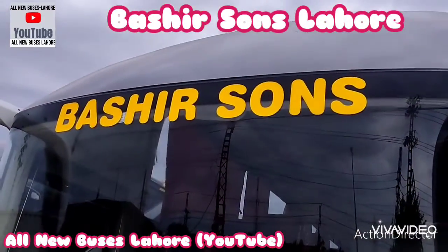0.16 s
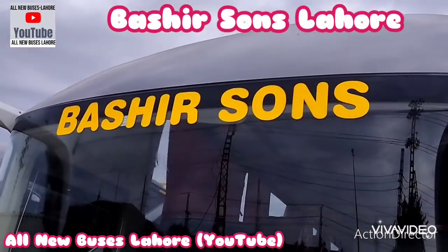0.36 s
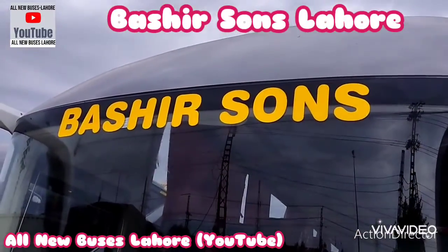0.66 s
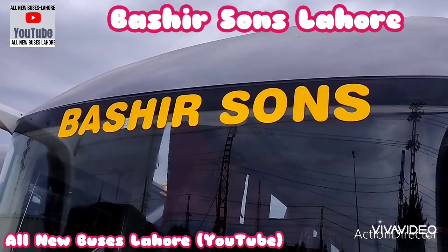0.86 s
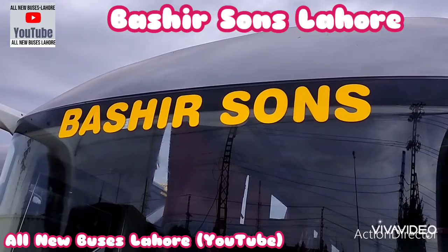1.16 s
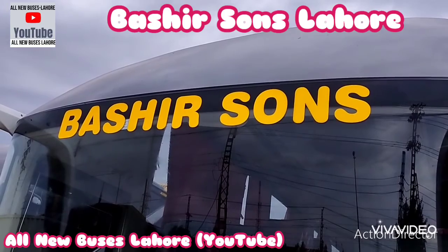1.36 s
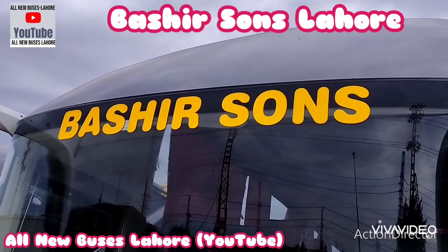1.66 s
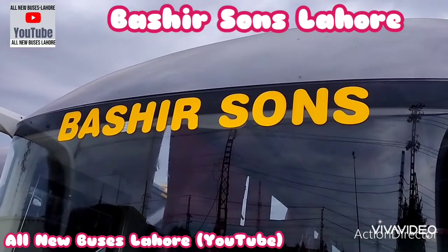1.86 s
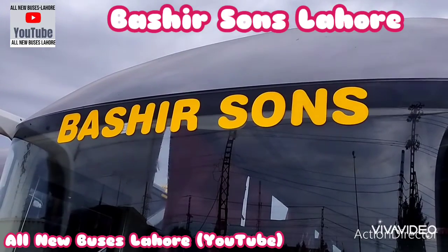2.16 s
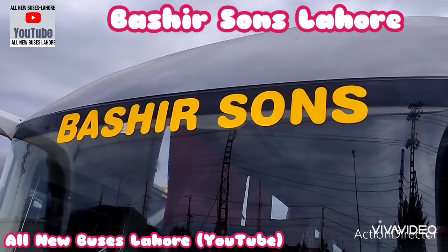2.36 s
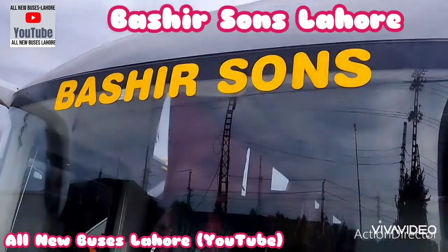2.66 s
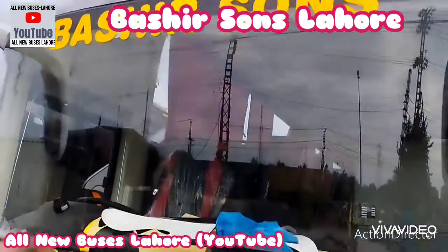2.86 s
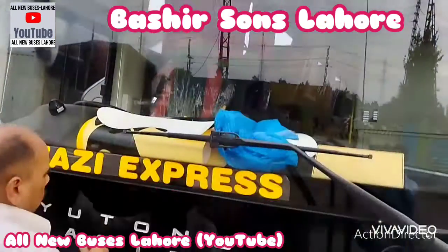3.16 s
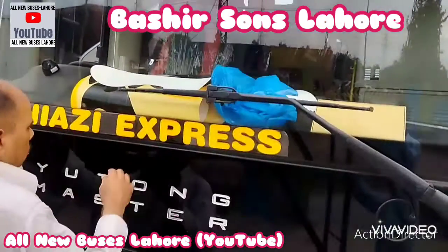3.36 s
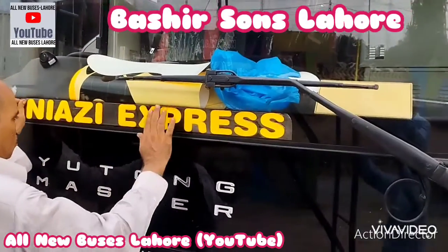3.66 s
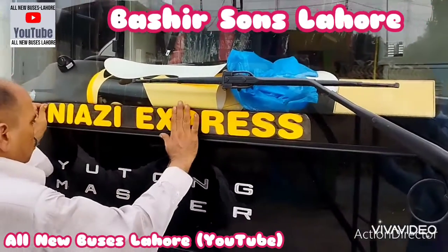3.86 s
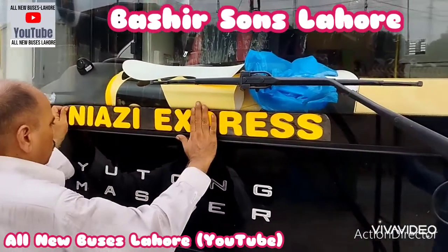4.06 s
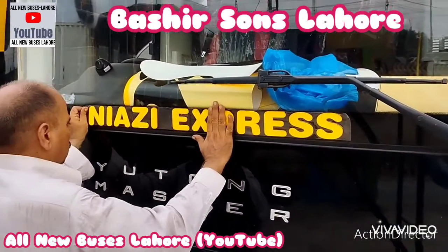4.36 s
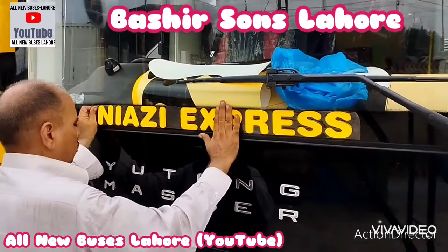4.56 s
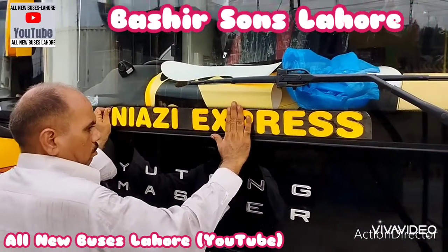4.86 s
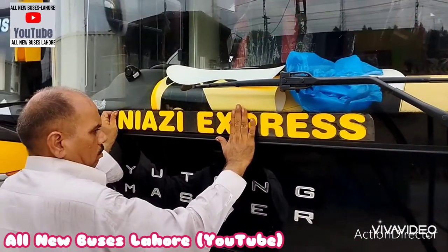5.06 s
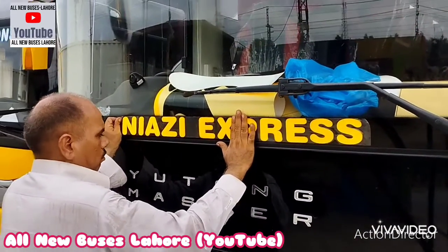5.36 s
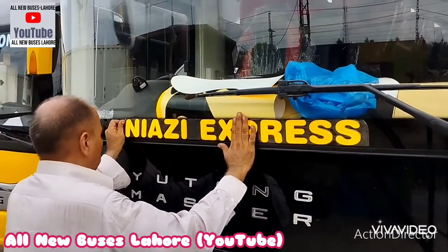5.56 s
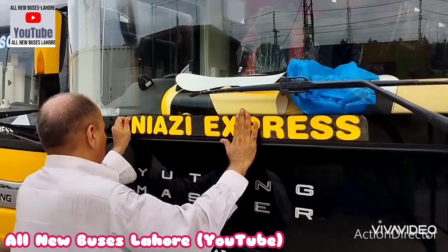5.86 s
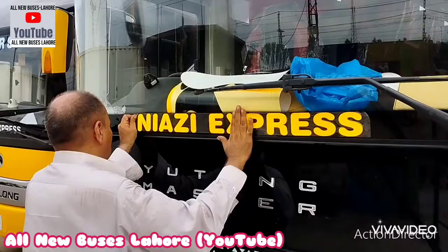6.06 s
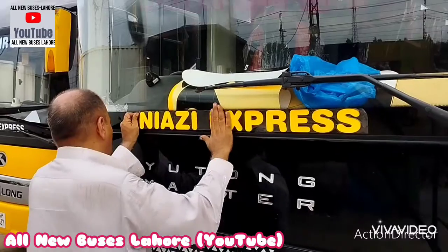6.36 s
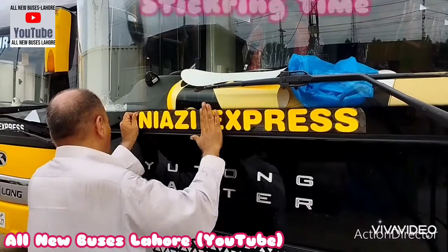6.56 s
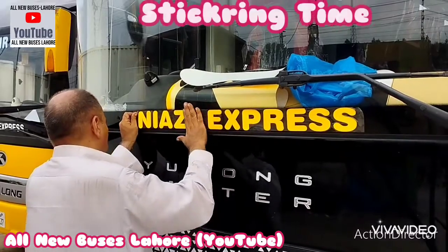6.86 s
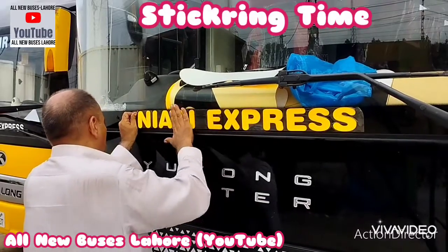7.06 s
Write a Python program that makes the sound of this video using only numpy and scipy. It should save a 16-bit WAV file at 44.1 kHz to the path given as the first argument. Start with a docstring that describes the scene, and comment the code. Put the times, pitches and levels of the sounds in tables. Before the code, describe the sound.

A palm squeaks and chirps on smooth glass in rapid stuttering bursts, then only dry rubbing strokes remain over a low yard hum.

```python
"""Squeaky palm on a windscreen

A palm presses vinyl lettering onto a bus windscreen in an open workshop yard.
The skin sticks and slips about 3000 times a second: clean squeaks, rough chirps and snags that ring
the pane, over the noise of rubbing; then dry strokes only. Around it are shaped noise for the yard,
wavering sines for a humming machine and a distant drone, and low noise for air on the microphone."""
import sys
import numpy as np
from scipy import signal
from scipy.fft import rfft, irfft, next_fast_len
from scipy.io import wavfile
from scipy.ndimage import uniform_filter1d

SR = 44100
rng = np.random.default_rng(int(sys.argv[2]) if len(sys.argv) > 2 else 0)


def master(y):
    """Save y as 16-bit WAV."""
    cut = np.clip(np.atleast_2d(y).T, -1, 1)
    pcm = np.round(cut * 32767)  # scale
    wavfile.write(sys.argv[1], SR, pcm.astype(np.int16))


N = 317961
TIME = np.arange(N) / SR  # s

# colour of dragging skin, for the rubbing and the scuff in the squeaks: f/Hz, relative level/dB per Hz
RASP_COLOUR = [(700, -4), (1300, 0.5), (2200, 4.5), (3200, 2), (4500, 1), (6000, -1), (7200, -2),
               (8300, -11.5), (16000, -44)]


def from_db(db):
    """Turn decibels into a gain."""
    return 10 ** (np.asarray(db) / 20)


def rms_one(x):
    """Scale to an average (rms) strength of 1."""
    return x / np.sqrt(np.mean(x ** 2) + 1e-20)


def in_time(rows):
    """Read each column of a curve at every sample."""
    s, *columns = np.transpose(rows)
    return [np.interp(TIME, s, c) for c in columns]


def at_hz(points, hz):
    """Read each column of a spectrum along a log-frequency axis."""
    f, *columns = np.transpose(points)
    return [np.interp(np.log(hz), np.log(f), c) for c in columns]


def drift(rate):
    """Smooth random wandering with spread 1; a higher rate wanders faster."""
    # worked out at an eighth of the sample rate; the first 8000 values let the filter settle
    r = np.exp(-16 * np.pi * rate / SR)
    noise = rng.standard_normal(N // 8 + 8002)
    slow = signal.lfilter([1], [1, -2 * r, r * r], noise)[8000:]
    return np.interp(np.arange(N) / 8, np.arange(len(slow)), rms_one(slow))


def pan(balance_db):
    """Left and right gains of equal total power, from left minus right in dB."""
    gains = from_db(np.atleast_1d(balance_db) * np.array([[.5], [-.5]]))
    return gains / np.sqrt(np.mean(gains ** 2, axis=0))


def white():
    """Unrelated noise in two channels."""
    return rng.standard_normal((2, N))


def coloured(spectrum, excitation):
    """Mix two unrelated noises into a stereo pair with this spectrum and rms 1."""
    # how noise reaches the two ports: f/Hz, likeness -1 to 1, left minus right level/dB
    ports = [(30, 0.99, 10), (70.5, 0.91, -5.5), (129, 1, -1), (297, 0.83, -0.5), (627, 0.57, 0),
             (1500, -0.47, -6.5), (2370, 0.014, -5.5), (4500, -0.15, -3.5), (6900, 0.16, -8),
             (14300, -0.36, -2)]
    size = next_fast_len(N)
    hz = np.maximum(np.fft.rfftfreq(size, 1 / SR), 1)
    mid, side = rfft(excitation, size)
    alike, balance_db = at_hz(ports, hz)
    alike = np.clip(alike, -1, 1)
    shared = np.sqrt(1 + alike) * mid
    opposed = np.sqrt(1 - alike) * side * [[1], [-1]]
    pair = (shared + opposed) * pan(balance_db)
    level_db, = at_hz(spectrum, hz)
    low_edge = 1 / np.sqrt(1 + (spectrum[0][0] / hz) ** 4)  # fades below the first frequency
    return rms_one(irfft(pair * low_edge * from_db(level_db), size)[:, :N])


def ring(clicks, hz, t60):
    """A unit click starts a sine of height 1 that falls by 60 dB in t60 seconds."""
    r, w = from_db(-60 / (t60 * SR)), 2 * np.pi * hz / SR
    return signal.lfilter([0, np.sin(w)], [1, -2 * r * np.cos(w), r * r], clicks + 1e-18)


def swell(s, length):
    """A smooth rise and fall around a moment."""
    return np.exp(-2 * ((TIME - s) / length) ** 2)


def yard_rumble(exposure_db):
    """Shaped noise for the yard, following a quarter or so of the exposure in dB."""
    # rumble of the yard: f/Hz, relative level/dB per Hz
    yard_colour = [(20, 7), (35, 5), (60, -2), (110, 0.5), (160, 0.5), (205, -9), (270, -5), (350, -10.5),
                   (500, -12.5), (800, -16.5), (1300, -21), (3000, -34.5), (8000, -80), (16000, -116)]
    return from_db(-23.5 + 0.24 * exposure_db) * coloured(yard_colour, white())


def hum(exposure_db, waver_db, wander, spread):
    """Machine tones that waver a little and reach the two ports at different phases."""
    # machine tones: f/Hz, rms level/dB before exposure and waver
    machine_lines = [(32.3, -25.5), (38.4, -30), (106, -37.5), (220, -36.5), (233, -34), (261, -38.5),
                     (274, -40.5)]
    out = 0
    for hz, db in machine_lines:
        shade_db = exposure_db * (hz > 100)  # the deepest tones ignore the exposure
        phase = 2 * np.pi * hz * TIME + wander * drift(0.87) + rng.uniform(0, 2 * np.pi)
        port_phase = spread * drift(2.1) * np.array([[1], [-1]])
        out = out + from_db(db + shade_db + waver_db * drift(1.73)) * np.sin(phase + port_phase)
    return np.sqrt(2) * out * pan(balance_db=0.0)


def drone(width_hz, gain_db, throb_db, overtone_hz, overtone_db):
    """A low distant note wavers in pitch and level; ringing noise adds a faint blurred overtone."""
    # the drone's rises and falls: t/s, f/Hz before wavering, level/dB before the gain
    drone_curve = [(1.85, 150, -42), (2.04, 162, -24.5), (2.2, 142.2, -24.5), (2.4, 139.3, -28),
                   (2.52, 156.3, -22.5), (2.66, 167, -25.5), (2.72, 148.5, -23), (2.84, 146.4, -22),
                   (3.02, 131.3, -28.5), (3.27, 165, -25), (3.5, 149, -44)]
    hz, level_db = in_time(drone_curve)
    phase = 2 * np.pi * np.cumsum(hz + width_hz * drift(15.2)) / SR
    note = rms_one(np.sin(phase) * from_db(throb_db * drift(16)))
    blur = rms_one(ring(rng.standard_normal(N), overtone_hz, t60=0.17))
    return from_db(level_db + gain_db) * (note + from_db(overtone_db) * blur)


def buffeting(gain_db):
    """Low noise of air on the ports, stronger on the left: gusts swell over a faint breeze."""
    # gusts: middle t/s, swell length/s, peak level/dB before the gain
    gusts = [(0, 0.14, -21), (1.76, 0.14, -16), (1.972, 0.088, -15.5), (3.04, 0.06, -19), (3.18, 0.09, -19),
             (3.838, 0.43, -16.5), (7.21, 0.39, -21.5)]
    # colour of the air noise: f/Hz, relative level/dB per Hz
    air_colour = [(20, 0.5), (40, 3), (70, 0.5), (130, -4), (200, -12), (400, -24), (1000, -71)]
    power = from_db(-31.5) ** 2  # the breeze between gusts
    for s, length, db in gusts:
        power = power + (from_db(db) * swell(s, length)) ** 2
    return from_db(gain_db) * np.sqrt(power) * coloured(air_colour, white()) * pan(balance_db=16.5)


def polishing(count):
    """Evenly paced strokes to and fro, each shorter and with more hiss than the one before."""
    start_s, period_s = 6.262, 0.201
    first_length_s, shortening = 0.093, 0.8
    rasp_db, hiss_db, hiss_rise_db = -37.5, -31.5, 2  # before the gains in rubbing
    return [(start_s + k * period_s, first_length_s * shortening ** k, rasp_db, hiss_db + k * hiss_rise_db)
            for k in range(count)]


def rubbing(rasp_db, hiss_db, grain_db, hiss_grain_db):
    """Skin ridges catch in dense uneven grains; fast sliding adds a finer, brighter hiss."""
    # steady contact of the palm: t/s, rasp level/dB, hiss level/dB (before the gains)
    steady_contact = [(0, -36.5, -37), (0.92, -37.5, -39.5), (1.22, -37, -34), (1.6, -40, -35.5),
                      (2.15, -37, -36), (2.45, -45, -35.5), (2.7, -36, -33), (3.32, -45, -42),
                      (3.55, -37, -33.5), (3.95, -39, -35), (4.7, -42.5, -40.5), (4.97, -34.5, -28.5),
                      (5.45, -36.5, -34.5), (5.9, -37, -30.5), (6.5, -39.5, -33.5), (7.21, -37.5, -32.5)]
    # single strokes: middle t/s, swell length/s, rasp level/dB, hiss level/dB (before the gains)
    single_strokes = [(0.222, 0.034, -33, -46), (0.507, 0.086, -34, -35), (0.772, 0.12, -31.5, -28.5),
                      (1.075, 0.098, -32, -25), (2.315, 0.083, -36.5, -31.5), (2.576, 0.027, -32.5, -33),
                      (3.472, 0.059, -32.5, -36), (4.082, 0.079, -37.5, -27), (4.353, 0.082, -37.5, -35),
                      (4.803, 0.058, -46, -32.5)]
    # colour of fast sliding: f/Hz, relative level/dB per Hz
    hiss_colour = [(2000, -14), (5000, -7), (6800, -1), (8200, -11), (9300, -7), (11000, -11), (12500, -4),
                   (15000, 0), (16000, -1)]
    drag, slide = from_db(in_time(steady_contact))
    for s, length, drag_db, slide_db in list(single_strokes) + polishing(count=5):
        stroke = swell(s, length)
        drag = np.hypot(drag, from_db(drag_db) * stroke)
        slide = np.hypot(slide, from_db(slide_db) * stroke)
    drag_noise = coloured(RASP_COLOUR, white() * from_db(grain_db * drift(100)))
    slide_noise = coloured(hiss_colour, white() * from_db(hiss_grain_db * drift(130)))
    return from_db(rasp_db) * drag * drag_noise + from_db(hiss_db) * slide * slide_noise


def snags(release_s, gain_db, crack_db, ticks_per_s):
    """Each snag lets go with a crack, then a dying crackle of small slips, and the pane rings."""
    # the palm snags and lets go: t/s, strength level/dB before crack and crackle gains
    snag_times = [(0.083, -19), (0.1888, -6), (0.2166, -13), (0.4843, -7), (0.499, -17), (0.521, -15),
                  (0.761, -8), (0.7942, -12.5), (0.9725, -8.5), (1.978, -16), (2.335, -16), (2.572, -10),
                  (3.4437, -16)]
    # ringing tones of the pane: f/Hz, level/dB, time to fall by 60 dB/s
    pane_modes = [(2360, -2, 0.014), (3270, -4, 0.0099), (3845, 0, 0.017), (4370, -1, 0.0082),
                  (5520, 0.5, 0.0089)]
    slips = np.zeros(N)
    ticks = (rng.random(N) < ticks_per_s / SR) * rng.standard_normal(N)
    for s, peak_db in snag_times:
        start = int(s * SR)
        fade = np.exp(-np.minimum((TIME[start:] - s) / release_s, 20))
        slips[start:] += from_db(peak_db + gain_db) * fade * ticks[start:]
        slips[start] += from_db(peak_db + crack_db)
    # neighbouring tones ring with opposite signs
    return sum((-1) ** k * from_db(db) * ring(slips, hz, t60) for k, (hz, db, t60) in enumerate(pane_modes))


def catches(per_s, unevenness):
    """The skin grips and lets go unevenly: progress 0-1 through each catch, its pitch and strength."""
    turns = np.cumsum(per_s * np.exp(unevenness * drift(59.43))) / SR
    pitch, strength = rng.standard_normal((4000, 2))[turns.astype(int) % 4000].T
    return turns % 1, pitch, uniform_filter1d(strength, size=40)


def contact(s, length):
    """The samples of one squeak, the way through it from -.5 to .5, and its soft-edged gate."""
    edge_s = .0014  # each fade reaches this far to either side of its end of the squeak
    length = max(length, .005)
    span = slice(max(int((s - edge_s) * SR), 0), int((s + length + edge_s) * SR))
    along = (TIME[span] - s) / length - .5
    gate = np.clip((.5 - abs(along)) * length / (2 * edge_s) + .5, 0, 1)
    return span, along, np.sin(gate * np.pi / 2) ** 2


def grips():
    """Give every squeal, note and chirp as (samples, gate, level dB, pitch Hz, roughness)."""
    # how raggedly the skin grips in the squeals: t/s, roughness 0-1
    ragged_curve = [(.08, .25), (.14, .55), (.29, .35), (1.37, .9), (1.48, .8), (3.4, .5), (4.05, .45),
                    (4.17, .5), (4.25, .8), (4.57, .35), (4.65, .6), (4.8, .4)]
    # long stuttering squeals of the dragged palm, one curve each: t/s, f/Hz, level/dB before a small cut
    squeal_curves = [
        [(0.067, 3400, -28.5), (0.082, 3200, -25), (0.112, 3050, -24), (0.132, 2560, -28), (0.14, 3000, -32),
         (0.175, 3050, -28)],
        [(0.25, 3076, -26), (0.272, 3110, -29), (0.283, 2974, -21.5), (0.296, 2900, -24), (0.302, 3050, -32),
         (0.312, 3130, -26), (0.33, 2990, -36)],
        [(1.305, 3500, -30), (1.335, 3480, -24), (1.355, 3480, -41), (1.396, 3280, -20), (1.404, 3360, -27),
         (1.422, 3350, -27), (1.437, 3170, -23.5), (1.462, 3300, -27.5), (1.52, 3000, -26.5),
         (1.64, 2980, -27.5), (1.69, 3050, -31), (1.78, 3000, -35)],
        [(3.065, 3150, -28), (3.14, 3060, -35)],
        [(3.355, 3245, -33), (3.372, 3020, -18), (3.386, 3087, -22), (3.41, 3020, -20.5), (3.43, 3140, -26),
         (3.46, 2970, -34)],
        [(3.724, 3040, -27.5), (3.76, 3030, -31.5), (3.822, 2990, -35), (3.836, 3010, -26), (3.9, 2970, -36)],
        [(4.026, 2840, -33), (4.055, 2740, -29), (4.075, 2600, -26), (4.1, 2720, -35), (4.122, 2920, -23),
         (4.15, 3160, -28)],
        [(4.15, 3280, -29), (4.172, 3170, -20), (4.2, 3190, -25.5), (4.225, 3290, -27), (4.262, 3230, -25.5),
         (4.285, 3230, -37)],
        [(4.335, 2680, -40), (4.365, 2860, -33), (4.42, 3080, -32)],
        [(4.545, 3126, -22), (4.565, 3175, -23), (4.595, 3090, -31), (4.63, 3160, -25.5), (4.67, 3315, -33),
         (4.72, 3290, -22), (4.775, 3300, -31), (4.85, 3180, -38)],
    ]
    # even slips sing clean notes: start t/s, length/s, level/dB, middle f/Hz, glide/Hz
    clean_notes = [(0.015, 0.032, -22.5, 3210, 60), (0.374, 0.058, -25, 3220, -2),
                   (.635, .037, -22.5, 3170, -40), (1.239, 0.019, -26, 3500, 192),
                   (1.595, 0.02, -17.5, 3035, -50), (1.829, 0.02, -18.5, 2946, 102),
                   (1.902, 0.048, -23, 3265, -30), (2.363, 0.036, -16.5, 3130, 200),
                   (2.444, 0.02, -21, 3050, -120), (2.638, 0.049, -15.5, 3100, 218),
                   (4.484, 0.039, -20, 3173, -150)]
    # the skin catches once and chirps: start t/s, length/s, middle level/dB, middle f/Hz
    single_chirps = [(.048, 0.0057, -18.5, 2800), (0.097, .009, -19, 2870), (0.113, 0.0072, -23, 2740),
                     (.126, .008, -26, 2510), (0.147, 0.0076, -24, 2850), (0.217, .008, -18, 3000),
                     (0.427, 0.0089, -21.5, 3080), (0.452, 0.009, -22.5, 2980), (.528, .005, -30, 3080),
                     (0.543, .007, -27.5, 2940), (0.62, .014, -20, 2910), (.672, 0.0077, -18.5, 2960),
                     (.686, 0.012, -22, 2770), (0.869, .009, -24, 3000), (0.88, .01, -24, 2970),
                     (0.902, .008, -31, 2950), (0.953, .012, -23.5, 3040), (1.382, 0.0065, -16.5, 3100),
                     (1.423, 0.0091, -17, 2977), (1.506, .009, -25, 2940), (1.523, .011, -15.5, 2945),
                     (1.536, .008, -21, 2760), (1.543, 0.0097, -19, 3060), (1.557, 0.014, -18.5, 2904),
                     (1.583, 0.0098, -23, 3090), (1.619, 0.0091, -16.5, 2990), (1.632, .014, -21, 3026),
                     (1.648, 0.015, -23, 2910), (1.673, .009, -25, 3300), (1.684, 0.011, -21.5, 3170),
                     (1.701, 0.011, -19.5, 3030), (1.72, 0.011, -22.5, 3240), (1.734, 0.006, -17.5, 2850),
                     (1.757, 0.018, -23, 3190), (1.804, .013, -18, 2853), (1.851, 0.013, -21.5, 2870),
                     (1.88, 0.011, -22, 2980), (1.941, .009, -17, 3090), (1.953, 0.0073, -17, 3040),
                     (1.962, .007, -20, 2950), (1.988, .013, -18.5, 3064), (2.023, .007, -21, 3210),
                     (2.066, .006, -22, 3300), (2.131, .011, -25, 3050), (2.147, 0.0084, -21, 3020),
                     (2.304, 0.008, -23, 2970), (2.328, 0.0062, -20, 3350), (2.345, .007, -15, 2860),
                     (2.405, 0.009, -16.5, 3280), (2.421, 0.0066, -13.5, 3085), (2.431, .012, -13, 3047),
                     (2.506, 0.011, -22, 2730), (2.532, 0.013, -18, 3100), (2.547, .007, -19.5, 2790),
                     (2.57, 0.011, -18.5, 3074), (2.692, 0.01, -21, 3080), (2.726, .0075, -15.5, 3070),
                     (2.748, 0.02, -22, 3070), (2.823, .01, -16, 2926), (2.851, 0.012, -27, 2894),
                     (2.911, 0.0095, -24, 3000), (2.978, .009, -27, 2950), (2.991, .013, -15.5, 3067),
                     (3.01, 0.0074, -14, 2880), (3.02, 0.0065, -12.5, 2690), (3.029, 0.0071, -16, 3010),
                     (3.038, .006, -15.5, 3253), (3.048, 0.0063, -15.5, 3195), (3.057, .006, -13.5, 3070),
                     (3.145, 0.014, -15, 3040), (3.182, 0.017, -13.5, 3320), (3.249, 0.0074, -15, 3100),
                     (3.28, 0.013, -25, 2970), (3.301, .007, -12, 3250), (3.31, .017, -22.5, 3150),
                     (3.913, 0.0075, -17.5, 3020), (3.924, 0.01, -20, 3090), (4.014, .012, -18, 2880),
                     (4.359, 0.0089, -26, 2890), (4.377, .008, -25, 3070), (4.399, 0.014, -24, 3030),
                     (4.525, 0.015, -23, 3026), (4.728, 0.011, -18.5, 3115), (5.812, 0.0072, -25, 2330)]
    ragged = np.clip(in_time(ragged_curve)[0], 0, 1)
    for curve in squeal_curves:
        s, hz, db = np.transpose(curve)
        span, along, gate = contact(s[0], s[-1] - s[0])
        level_db = np.interp(TIME[span], s, db) - 0.5
        yield span, gate, level_db, np.interp(TIME[span], s, hz), ragged[span]
    for s, length, db, hz, glide_hz in clean_notes:
        span, along, gate = contact(s, length)
        arch_hz = 60 * (2 * along) ** 2  # the ends sag below the middle
        yield span, gate, db, hz + glide_hz * along - arch_hz, .035
    for s, length, db, hz in single_chirps:
        glide_hz = -60 - 18 * (db + 19.5)  # louder chirps fall further; the faintest rise
        span, along, gate = contact(s, length)
        yield span, gate, db + 0.5 * along, hz + glide_hz * along, .32  # grows by half a dB


def squeaks(step_hz, fall_hz, jitter_hz, flutter_db, dip, bite_db, scrape_db, patch_db, patch_above_hz,
            scuff_db):
    """Stick-slip tone: rough grips break into falling catches, with chattering skin patches and scuff."""
    # octave partial as the hand moves over the pane: t/s, level/dB against the tone, before its bite
    octave_curve = [(0.03, -9.5), (0.15, -5), (0.29, -3), (0.4, -4.5), (0.54, 7), (0.62, -2), (0.68, 2),
                    (0.88, -2.5), (1.4, -3.5), (1.6, -5), (1.8, -3.5), (1.86, -9), (1.93, -4.5),
                    (2.4, -8.5), (2.67, -4.5), (2.75, -12.5), (3.0, -15), (3.35, -8.5), (4.05, -5.5),
                    (4.5, -9)]
    out = np.zeros(N)
    progress, step, strength = catches(per_s=125, unevenness=.35)
    wobble, grit, bite = drift(144), drift(500), drift(77)
    # nearby patches of skin chatter just above the squeak's pitch
    patches = (drift(350) + 1j * drift(270)) * np.exp(2j * np.pi * patch_above_hz * TIME)
    scuff = from_db(scuff_db) * coloured(RASP_COLOUR, white())[0]
    octave_db, = in_time(octave_curve)
    for span, gate, level_db, pitch, rough in grips():
        some_rough = np.sqrt(rough)
        catch_hz = step_hz * step[span] + fall_hz * (.5 - progress[span])
        pitch = pitch + rough * catch_hz + some_rough * jitter_hz * wobble[span]
        phase = 2 * np.pi * np.cumsum(pitch) / SR
        # the tone weakens at both ends of each catch
        release = 1 - np.minimum(dip * some_rough, 1) * (1 - np.sin(np.pi * progress[span]))
        grip = gate * rms_one(release * from_db(flutter_db * some_rough * strength[span]))
        octave = from_db(octave_db[span] + bite_db * some_rough * bite[span])
        tone = np.sin(phase) + octave * np.sin(2 * phase)
        scrape = 1 + from_db(scrape_db) * rough * grit[span]
        chatter = from_db(patch_db) * some_rough * np.imag(patches[span] * np.exp(1j * phase))
        chatter = chatter + rough * scuff[span]
        out[span] += np.sqrt(2) * from_db(level_db) * (grip * tone * scrape + gate * chatter)
    return out


def reflections(x, t60, count=60):
    """Sparse echoes from nearby bodywork and ground, different at each port."""
    delays = rng.uniform(.002, .12, (2, count))  # s
    response = np.zeros((2, SR // 4))
    for side, late in zip(response, delays):
        side[(late * SR).astype(int)] = rng.choice([-1, 1], count) * from_db(-60 * late / t60)
    response /= np.sqrt(np.sum(response ** 2, axis=1, keepdims=True))
    return signal.fftconvolve(x[None], response, axes=1)[:, :N]


def scene():
    """The hand, right of centre, with its echoes, over the noises of the yard."""
    # turning the microphone downwards lets in more machine, except its deepest tones: t/s, level/dB
    exposure_curve = [(0, -1), (2.8, -2.5), (4.2, 1.5), (5.4, 2), (7.2, 2)]
    # where the hand is heard: t/s, left minus right level/dB, left lead/ms
    hand_place = [(0, -11.5, 0.028), (2.0, -10, 0.041), (2.4, -3, 0.026), (2.8, -11, 0.023),
                  (3.4, -5.5, 0.043), (4.1, -13, 0.087), (4.8, -7, 0.11)]
    exposure_db, = in_time(exposure_curve)
    yard = yard_rumble(exposure_db) + hum(exposure_db, waver_db=2.0, wander=0.74, spread=0.16)
    far = drone(width_hz=5.5, gain_db=-2, throb_db=2.1, overtone_hz=504, overtone_db=-17.5)
    air = buffeting(gain_db=3.0)
    rub = rubbing(rasp_db=8.0, hiss_db=8.0, grain_db=2.0, hiss_grain_db=1.5)
    glass = snags(release_s=0.022, gain_db=-15, crack_db=-5.5, ticks_per_s=700)
    glass = glass + squeaks(step_hz=168.7, fall_hz=450, jitter_hz=70, flutter_db=2.5, dip=0.88, bite_db=5.0,
                            scrape_db=-10, patch_db=-9.5, patch_above_hz=110, scuff_db=-7.5)
    balance_db, lead_ms = in_time(hand_place)
    early_left = np.interp(TIME + lead_ms / 1000, TIME, glass)
    direct = np.array([early_left, glass]) * pan(balance_db)
    echoes = from_db(-5.5) * reflections(glass, t60=0.36) * pan(balance_db=-7.5)
    return yard + far + air + rub + direct + echoes


def record(dry):
    """Round off the highest peaks, then cut the top steeply."""
    ceiling, cutoff_hz = .93, 15600
    rounded = dry / (1 + (dry / ceiling) ** 8) ** (1 / 8)
    steep_cut = signal.ellip(12, .05, 70, cutoff_hz, fs=SR, output="sos")
    return signal.sosfiltfilt(steep_cut, rounded)


dry = scene()
out = record(dry)
master(out)
```